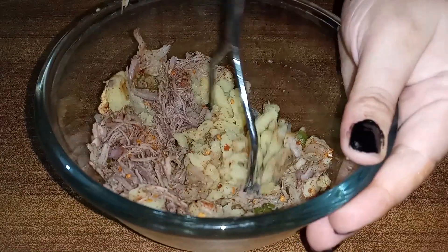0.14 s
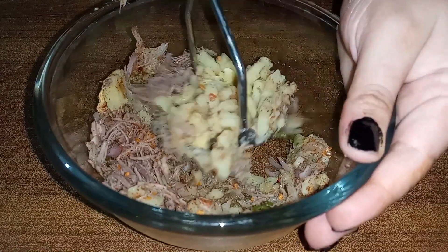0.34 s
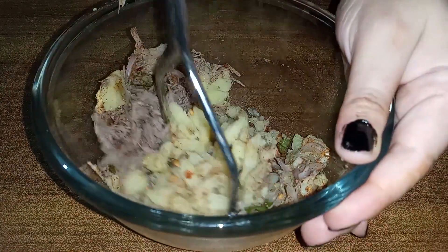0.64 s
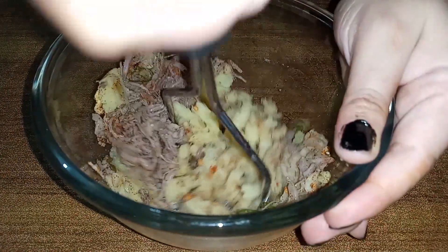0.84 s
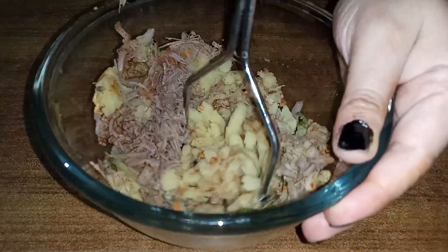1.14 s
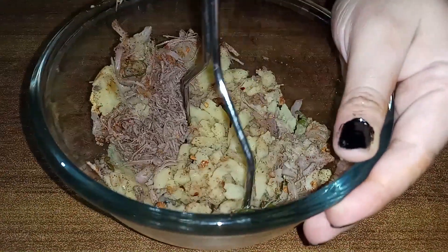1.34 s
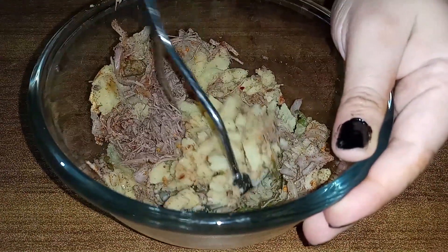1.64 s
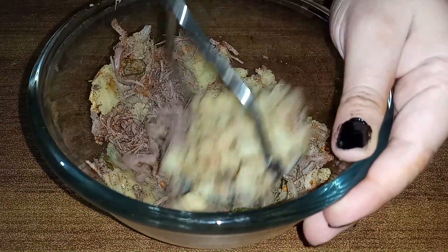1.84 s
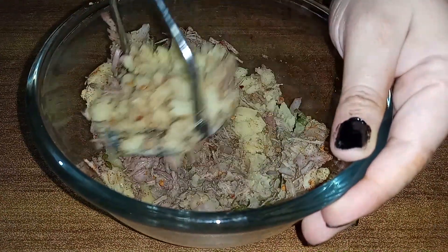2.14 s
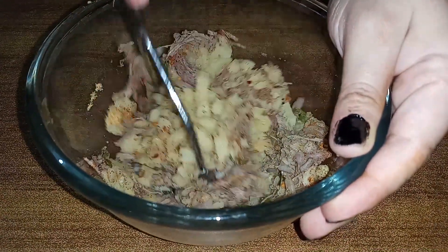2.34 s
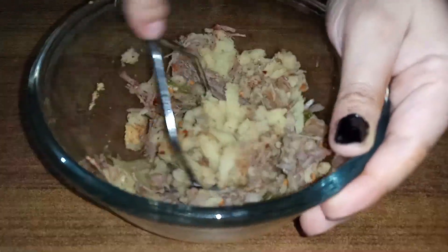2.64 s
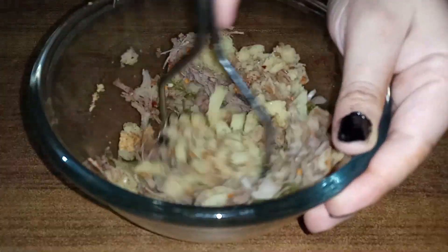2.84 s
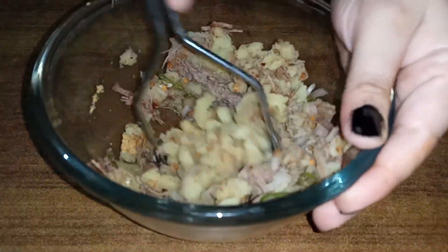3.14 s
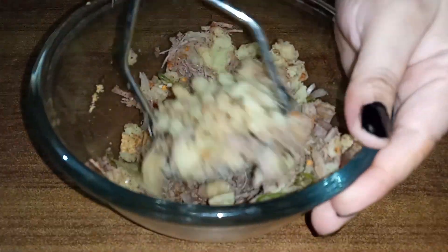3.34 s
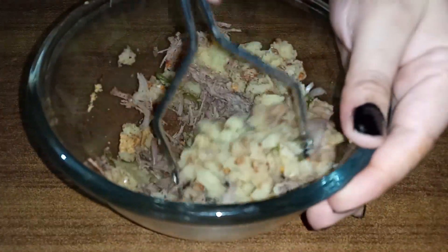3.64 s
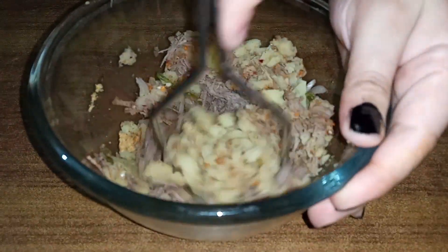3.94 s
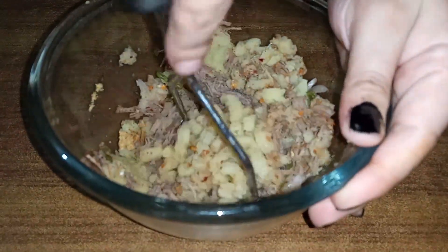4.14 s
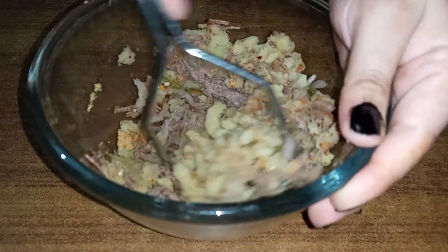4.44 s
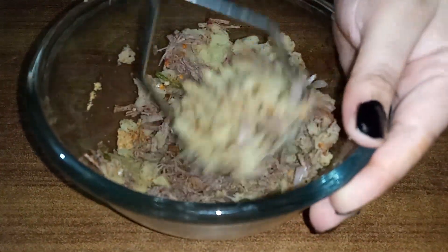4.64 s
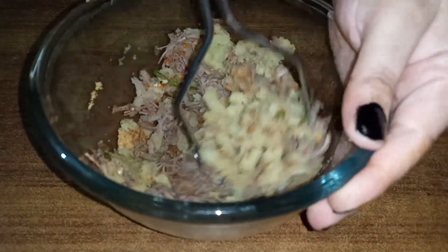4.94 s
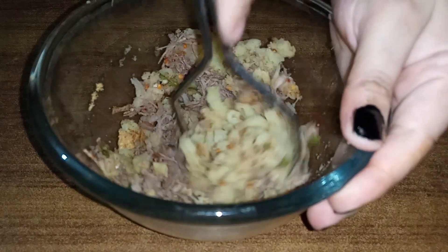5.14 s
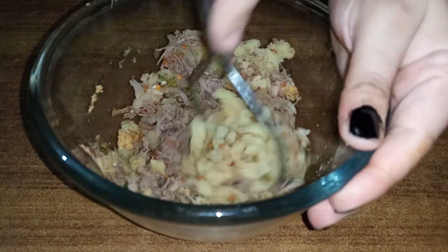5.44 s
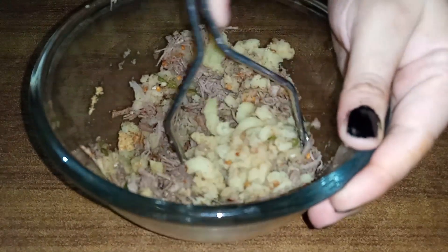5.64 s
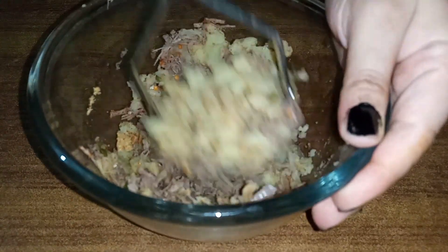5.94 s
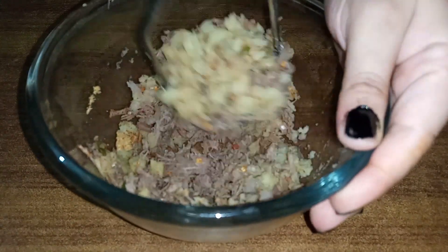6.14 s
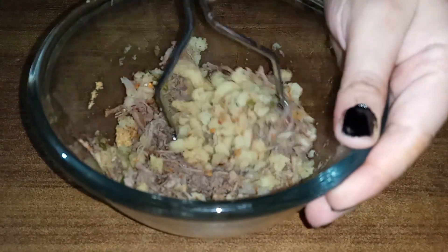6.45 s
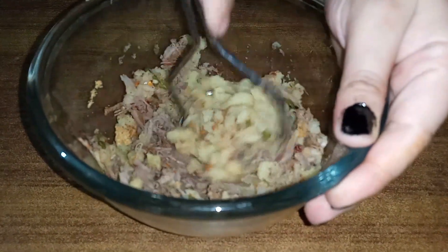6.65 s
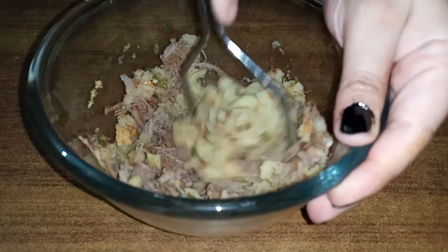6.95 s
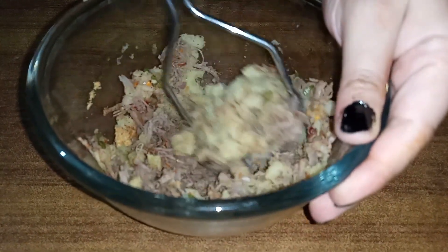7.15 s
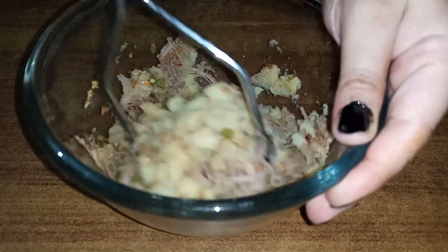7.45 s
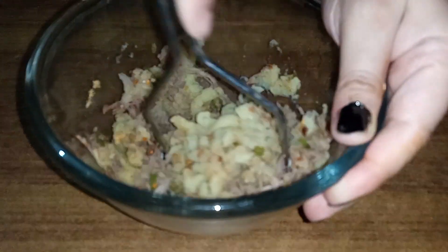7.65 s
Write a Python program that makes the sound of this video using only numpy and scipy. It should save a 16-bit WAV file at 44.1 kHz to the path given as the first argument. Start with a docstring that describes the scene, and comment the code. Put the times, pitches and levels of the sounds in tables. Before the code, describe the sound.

Moist mash crackles and squelches under a wire masher in a glass bowl, with dull knocks on a wooden table and rare glassy clinks.

```python
"""Wire masher in a glass bowl

A wire masher is pressed and twisted through a moist mash in a glass bowl on a wooden table.
Pitched pops and fizz make the mash crackle; bursts of wavelets squelch and dense low bubbles gurgle.
Ticks and bounces ring the damped glass modes; knocks and a leaning load ring the table top.
A small hard kitchen answers with decaying noise, heard by two microphones some way apart."""
import sys
import numpy as np
from scipy import signal
from scipy.fft import rfft, irfft, next_fast_len
from scipy.io import wavfile
from scipy.ndimage import uniform_filter1d

SR = 44100
rng = np.random.default_rng(int(sys.argv[2]) if len(sys.argv) > 2 else 0)


def unload_audio(sound):
    """Save the sound as a 16-bit wav file, at the path given as the first command line argument."""
    columns = np.transpose(np.atleast_2d(sound))
    # keep every value between -1 and 1, then stretch to whole-number steps
    steps = np.round(np.clip(columns, -1, 1) * 32767)
    wavfile.write(sys.argv[1], SR, steps.astype(np.int16))


def invert_db(x):
    """Field ratio 10**(x/20) for x, a level in decibels (scalar or array-like)."""
    u = np.asarray(x, float) / 20
    return 10 ** u


N = 343098  # length in samples

# balance of the two microphones: f/Hz, left over right/dB
LEFT_OVER_RIGHT = [(60, 3), (180, 3.5), (700, 7), (1400, 5.5), (2800, 9), (5600, 5), (9500, 7),
                   (14000, -7.5)]
# bowl knocking on the table: t/s, relative thump level/dB, favoured pitch f/Hz, hard edge re thump/dB
BOWL_KNOCKS = [(0.069, -25.5, 205, -5), (0.112, -31.5, 194, -35), (0.151, -27, 204, -16),
               (0.309, -50, 192, -43), (0.409, -23.5, 221, -12), (0.447, -37, 200, -32),
               (0.504, -48.5, 192, -10), (0.95, -40, 276, -3), (1.269, -36, 138, -34),
               (1.368, -39.5, 143, -49), (1.713, -52.5, 217, -18), (2.142, -33, 150, -30.5),
               (3.031, -49, 234, -9.5), (3.123, -49.5, 189, -30), (3.138, -25.5, 216, -6.5),
               (3.471, -36.5, 166, -13), (4.389, -45, 152.7, -30), (4.475, -38, 199, -19.5),
               (4.663, -22, 208, -5), (4.684, -32.5, 192, -16), (4.699, -35, 189, -12.5),
               (4.708, -27.5, 193, -16), (4.723, -28.5, 191, -11), (4.738, -29, 192, -17),
               (4.749, -28.5, 197, -7.5), (4.76, -34, 202, -5.5), (4.815, -28, 237, -6.5),
               (4.86, -38.5, 206, -18), (4.889, -41, 199, -18.5), (5.431, -54, 402.3, -13),
               (5.486, -44, 260, -8.5), (5.73, -43, 179, -8.5), (6.035, -43.5, 119, -27),
               (6.28, -56.5, 335, -30), (6.838, -48, 183, -6.5), (6.869, -42.5, 183, -34),
               (6.906, -47, 207, -9.5), (7.354, -39, 110, -17)]


def unit(x):
    """Scale to rms 1."""
    return x / np.sqrt(np.mean(x ** 2))


def colour(x, points, lag_s=0.):
    """Equalise by (f/Hz, gain/dB) points, straight between them over log frequency, and delay."""
    hz, db = np.transpose(points)
    length = x.shape[-1]
    size = next_fast_len(length, True)
    f = np.fft.rfftfreq(size, 1 / SR) + 1  # 1 Hz up, to keep the logarithm finite
    gain = invert_db(np.interp(np.log(f), np.log(hz), db))
    delay = np.exp(-2j * np.pi * f * lag_s)
    return irfft(rfft(x, size) * gain * delay, size)[..., :length]


def low_pass(x, hz):
    """Keep what lies below hz, without delay."""
    return signal.sosfiltfilt(signal.butter(2, hz, fs=SR, output="sos"), x)


def high_pass(x, hz):
    """Second-order low cut."""
    return signal.sosfilt(signal.butter(2, hz, "highpass", fs=SR, output="sos"), x)


def ring(x, hz, t60):
    """One decaying mode, with a peak near 1 for a unit blow."""
    radius = 10 ** (-3 / (t60 * SR))
    w = 2 * np.pi * hz / SR
    return signal.lfilter([np.sin(w)], [1, -2 * radius * np.cos(w), radius * radius], x)


def walk(rate):
    """Random levels held 1 / rate s and slewed twice."""
    k = int(SR / rate)
    steps = np.repeat(rng.standard_normal(N // k + 1), k)
    return uniform_filter1d(uniform_filter1d(steps, k), k)[:N]


def blows(s, gain, shape):
    """The push shape laid at each time."""
    x = np.zeros(N)
    np.add.at(x, (np.asarray(s) * SR).astype(int), gain)
    return signal.fftconvolve(x, shape)[:N]


def grains(s, hz, cycles, size):
    """Short damped wavelets, one for each row; cycles sets how many turns they take to fade by 1 / e."""
    out = np.zeros(N + SR)
    for at, f, c, g in zip((s * SR).astype(int), hz / SR, cycles, size):
        turn = np.arange(int(5 * c / f)) * f
        out[at:at + len(turn)] += g * np.cos(2 * np.pi * turn) * np.exp(-turn / c)
    return out[:N]


def effort_db(start, held, db, rise, fall, stall=0.):
    """Each effort swells, holds and dies away, ever faster as it stalls; overlapping ones add in power."""
    now = np.arange(0, N + 64, 64) / SR
    start, held, db, fall = (np.reshape(c, (-1, 1)) for c in (start, held, db, fall))
    before = np.maximum(start - now, 0)
    after = np.maximum(now - start - held, 0)
    each = db - rise * before - fall * after - stall * after ** 2
    total_db = 10 * np.log10(np.sum(invert_db(each) ** 2, axis=0) + 1e-16)
    return np.interp(np.arange(N) / SR, now, total_db)


def sides(left, right, left_lag_s=0.):
    """Colour the two microphones differently, and delay the left one."""
    hz, db = np.transpose(LEFT_OVER_RIGHT)
    return np.array([colour(left, np.c_[hz, db / 2], left_lag_s), colour(right, np.c_[hz, -db / 2])])


def pair(x):
    """The bowl is nearer the right microphone in time, so the left one hears it about 1 ms later."""
    return sides(x, x, 0.001036)


def pushes():
    """The masher driven through the mash: level of the squelch, and of the bowl's hollow relative to it."""
    # t/s, held/s, squelch level/dB, dying away/(dB per s), hollow of the bowl re squelch/dB
    push_rows = [(0, 0.18, -65.5, 143, -14), (0.072, 0.04, -51.5, 300, 0), (0.495, 0.13, -54, 88, -3.5),
                 (.65, 0.018, -52.5, 50, -8), (.74, 0.089, -54, 99, -12), (.89, 0.058, -51, 108, -10),
                 (0.957, 0.074, -49, 195, -10), (1.162, 0.022, -53, 100, -23), (1.194, 0.029, -47, 110, -5),
                 (1.34, 0.056, -62, 105, -24), (1.452, 0.048, -58, 240, -23), (1.6, 0.06, -76, 298, -29),
                 (1.71, 0.0047, -71.5, 160, -3), (1.76, 0.049, -84, 248, -12), (2.02, 0.073, -71.5, 95, -7),
                 (2.12, 0.018, -63.5, 104, -24), (2.161, 0.22, -49.5, 139, -2),
                 (2.555, 0.0086, -54.5, 111, -19), (2.612, 0.042, -49.5, 40, -10),
                 (2.701, 0.062, -51.5, 59, -4.5), (2.801, 0.025, -48, 158, -6.5),
                 (2.926, 0.073, -54.5, 143, -11), (3.05, 0.066, -63, 404, -26),
                 (3.5, 0.31, -52.5, 250, -7.5), (3.781, 0.12, -51.5, 41, -15.5),
                 (3.908, 0.011, -48, 116, -7.5), (3.97, 0.072, -60, 144, -9.5),
                 (4.101, 0.038, -55.5, 94.5, -25), (4.138, 0.051, -46, 108, -10),
                 (4.3, 0.03, -54, 189, -19), (4.41, 0.0082, -65, 270.5, -17.5), (4.8, .12, -51.5, 85, -9),
                 (4.981, 0.42, -52.5, 203, -9.5), (5.284, 0.083, -52, 78, -12),
                 (5.42, 0.072, -56.5, 100, -8), (5.53, 0.042, -55, 89, -17), (5.639, 0.13, -60, 408, -14),
                 (5.992, 0.099, -70.5, 43, -12.5), (6.115, 0.051, -59, 53, -16),
                 (6.191, 0.14, -50.5, 102, -7.5), (6.359, 0.055, -53.5, 302, -16),
                 (6.465, 0.018, -55.5, 101, -15), (6.533, 0.11, -50, 129, -10),
                 (6.69, 0.023, -57.5, 199, -26), (6.778, 0.16, -50.5, 130.5, -10.5),
                 (7.04, 0.0069, -57, 230, -3), (7.46, 0.028, -57, 60, 0), (7.55, 0.028, -57.5, 75, -25),
                 (7.59, 0.015, -52, 68, -7), (7.682, 0.094, -53.5, 94, -14), (7.76, .03, -52.5, 102, -10)]
    rise_db_s, stall_db_s2 = 540.5, 908.5
    s, held, db, fall, hollow = np.transpose(push_rows)
    squelch_db = effort_db(s, held, db, rise_db_s, fall, stall_db_s2)
    hollow_db = effort_db(s, held, db + hollow, rise_db_s, fall, stall_db_s2) - squelch_db
    return squelch_db, hollow_db


def film_snaps():
    """Small films snap all at once: random blows that each fade within milliseconds."""
    snaps_per_s, fade_s, least_db, spread_db = 120, 0.0015, -1.5, 2.5
    gap, luck = rng.exponential(size=(3000, 2)).T
    at = np.cumsum(gap) / snaps_per_s
    heard = at < N / SR
    gain = invert_db(least_db + spread_db * np.minimum(luck, 3))
    return blows(at[heard], gain[heard], np.exp(-np.arange(SR // 100) / SR / fade_s))


def tearing_films():
    """Pitched pops, one source to both microphones, over a dense fizz drawn apart for each."""
    when, pitch, length, luck = rng.random((7000, 4)).T
    size = invert_db(-4.5 * np.log(np.maximum(luck, .01)))
    pops = unit(grains(when * N / SR, 2600 * 6 ** pitch, 0.94 + 1.7 * length, size))
    fizz = rng.standard_normal((2, N)) * invert_db(4.2 * rng.standard_normal((2, N)))
    return invert_db(-14.0) * pair(pops) + unit(sides(fizz[0], fizz[1]))


def bowl_hollow(grain):
    """Air in the bowl resonates with the tearing films and wobbles in level."""
    # f/Hz, width of one filter pass/Hz, relative level/dB
    air_modes = [(1624, 268, 5.5), (1843, 180, 0)]
    hollow = 0
    for f, width, g in air_modes:
        b, a = signal.iirpeak(f, f / width, SR)
        resonance = unit(signal.lfilter(b, a, signal.lfilter(b, a, grain)))
        hollow = hollow + resonance * invert_db(g - 10 + 3 * walk(25))
    return hollow


def mash(squelch_db, hollow_db):
    """Wet films tear all over the bowl; small and large ones take turns, so the colour keeps shifting."""
    # colour of the wet mash: f/Hz, gain/dB
    mash_colour = [(180, -37), (300, -18.5), (565, -45.5), (994, -15.5), (1280, -22), (1610, -14.5),
                   (1950, -3.5), (2280, -7.5), (2650, -2), (3080, 2.5), (4020, 0), (7690, 7.5),
                   (9090, -4.5), (10900, 0), (13800, -14.5), (15200, 0), (16000, -47)]
    # borders between the sizes of film: f/Hz
    size_borders = [2410, 3600, 5500, 9100]
    snaps = film_snaps()
    flutter = invert_db(squelch_db + 0.4 + 0.74 * walk(45) + 2.5 * walk(170))
    grain = tearing_films()
    hollow = bowl_hollow(grain)
    wet = unit(colour(grain, mash_colour))
    below = [0] + [low_pass(wet, f) for f in size_borders] + [wet]
    shifting = 0
    for lower, upper in zip(below, below[1:]):
        shifting = shifting + invert_db(3.1 * walk(14) + 2.5 * walk(85)) * (upper - lower)
    bright = shifting - low_pass(shifting, 3500)  # the snaps are high in pitch
    return flutter * (shifting + snaps * bright + invert_db(np.minimum(hollow_db, 0)) * hollow)


def squelches():
    """A pocket of air bursts: a few milliseconds of wavelets scattered widely around its pitch."""
    # loud single squelches: t/s, relative level/dB, centre f/Hz
    pockets = [(.3612, -66, 7860), (.5642, -55, 7570), (.84, -51, 5000), (0.885, -51, 5800),
               (1.021, -38.5, 6840), (1.1142, -47.5, 7800), (1.1838, -44.5, 7640), (1.2146, -45, 7870),
               (1.2747, -46, 7400), (1.3854, -58, 7150), (1.4567, -57, 7100), (1.4871, -60.5, 7060),
               (1.7176, -54, 7860), (1.756, -63, 7150), (2.0259, -62, 7060), (2.0962, -56, 7000),
               (2.1531, -46, 4900), (2.208, -42, 6160), (2.3008, -51, 7000), (2.3189, -52.5, 7380),
               (2.3517, -56.5, 7780), (2.5038, -47, 6800), (2.5896, -61.5, 7000), (2.6172, -46, 3600),
               (2.9263, -56, 6950), (3.0655, -54.5, 6650), (3.097, -55.5, 8000), (3.35, -68, 8200),
               (3.7856, -53, 5900), (3.9112, -40.5, 6600), (4.029, -45.5, 6600), (4.0867, -50, 7550),
               (4.4234, -53, 7800), (4.915, -40.5, 7070), (5.158, -42.5, 7200), (5.208, -49.5, 7840),
               (5.2843, -51.5, 7800), (5.3078, -39.5, 6900), (5.4745, -53, 3300), (5.486, -46.5, 1800),
               (5.6512, -66, 6500), (5.6833, -49, 5990), (5.9894, -79, 7260), (6.0667, -53.5, 7100),
               (6.1291, -59, 7140), (6.359, -51, 6260), (6.3806, -35, 5500), (6.4172, -49, 6560),
               (6.4657, -47, 4500), (6.473, -54, 4500), (6.7763, -48, 6000), (6.8132, -45, 7400),
               (6.8427, -41.5, 6380), (6.922, -40, 7540), (7.0358, -50, 7060), (7.1288, -63, 7140),
               (7.548, -56.5, 7600), (7.6061, -47.5, 7240)]
    s, db, hz = np.repeat(pockets, 40, axis=0).T  # 40 wavelets each
    late, pitch, length = rng.random((len(s), 3)).T
    scattered_hz = np.minimum(hz * 2.6 ** (pitch - .5), SR / 3)
    size = invert_db(db + 6 * pitch - 14 * late)
    burst = grains(s + .0025 * late ** 2, scattered_hz, 1 + length, size)
    return high_pass(pair(burst), 1200)


def squish():
    """Mash squeezed through the wires gurgles low: dense, dull bubbles."""
    # t/s, held/s, level/dB
    squeeze_rows = [(.52, 0.098, -75), (2.17, 0.17, -68), (3.0, 0.15, -77.5), (3.5, 0.21, -71.5),
                    (4.132, 0.09, -73), (5.08, 0.07, -70), (5.38, 0.076, -66.5), (1.18, 0.047, -88),
                    (6.15, 0.17, -68.5), (6.82, 0.13, -70.5), (7.039, 0.039, -70.5), (7.501, 0.075, -73.5)]
    lowest_hz, span = 949, 1.7  # span: ratio of the highest pitch to the lowest
    rise_db_s, fall_db_s = 308.5, 272.5
    when, pitch, length, luck = rng.random((9000, 4)).T
    size = invert_db(-3.0 * np.log(np.maximum(luck, .05)))
    bubbles = grains(when * N / SR, lowest_hz * span ** pitch, 1.0 + 3.8 * length, size)
    dull = uniform_filter1d(uniform_filter1d(bubbles, size=11), size=11)
    level_db = effort_db(*np.transpose(squeeze_rows), rise_db_s, fall_db_s)
    return pair(invert_db(level_db) * unit(dull))


def wire_rub():
    """Wire sliding on the glass: uneven bright noise makes one mode squeak."""
    rub_db = effort_db(.485, .03, -68, 900, 148)  # start s, held s, relative dB, rise and fall dB per s
    scrape = invert_db(rub_db + 6.0 * walk(90)) * np.diff(rng.standard_normal(N + 1))
    return ring(scrape, 4550, 0.017)


def glass():
    """Each touch is a sharp tick and a quick bounce that ring the glass, damped by hand and mash."""
    # wire on glass: t/s, relative level/dB, then mode families 1, 2, 3 and bare tick re that/dB
    wire_clinks = [(0.409, -55.5, 9, -12, -21, -3.5), (0.941, -52, 18, 10.5, 21, 17.5),
                   (2.6175, -51.5, 8, 0, -5.5, -8), (3.428, -20, -13, -5, 1.5, -4),
                   (4.6642, -22.5, -0.5, -8, -18, -6), (4.6709, -40, 15, -12.5, -13, -6.5),
                   (4.692, -46, 14.5, -10.5, -14, -10.5), (4.735, -47, 17.5, -9, -14, -10.5),
                   (4.755, -49.5, 18.5, -8, -17, -8.5), (4.7135, -38.5, 14, -19, -12, -11),
                   (6.38, -48, 8, -17, 0, -4), (7.302, -74, 9.5, -13, -2, 8),
                   (7.3464, -23.5, -5.5, -5.5, -13, 3.5)]
    # f/Hz, relative level/dB, t60/s
    glass_modes = [(590, -6, 0.046), (1266, 5, 0.016), (1652, 5.5, 0.035), (1860, -2, 0.03),
                   (2090, -7.5, 0.025), (2415, -2.5, 0.036), (2620, 0.5, 0.03), (3140, 7, 0.013),
                   (3470, 11, 0.016), (4653, 11.5, 0.014), (4850, 4, .012), (5334, 8.5, 0.014),
                   (6710, 3, 0.026), (7400, 2.5, 0.008), (9060, -0.5, 0.02), (9400, -17, .02),
                   (10640, -13, 0.0082)]
    # family of each mode (1); members rise and fall together with the place of the blow
    mode_family = [1, 2, 1, 1, 1, 1, 3, 1, 2, 0, 0, 3, 0, 2, 0, 3, 0]
    s, db, *family_db, tick_db = np.transpose(wire_clinks)
    family_db = [0] + family_db  # family 0 keeps the level of the clink
    rub = wire_rub()
    t = np.arange(int(0.012 * SR)) / SR
    tick = blows(s, invert_db(db + tick_db + 7.0), t / 0.00071 * np.exp(-t / 0.00077)) * rng.standard_normal(N)
    out = colour(tick, [(400, -6.5), (1500, -6.5), (5000, 7), (8000, 6.0), (12000, 1.5),
                        (13600, -12.5), (15000, -3.0)])
    for k, (f, g, t60) in enumerate(glass_modes):
        gap = np.zeros(int(SR / f * np.ceil(.001 * f)) - 1)  # whole turns of the mode, 1 ms or more
        bounce = np.r_[.45, gap, .75, gap, .45]
        struck = blows(s, invert_db(db + family_db[mode_family[k]] - 11.0), bounce)
        out = out + (-1) ** k * invert_db(g) * ring(struck, f, t60)
    return pair(out + rub)


def rocking(s, gain, hz):
    """The bowl lands softly and springs back: a push and pull at its own pitch."""
    out = np.zeros(N)
    for at, g, f in zip((s * SR).astype(int), gain, hz):
        turn = np.arange(int(1.99 * SR / f)) * f / SR  # about two turns
        out[at:at + len(turn)] += g * np.hanning(len(turn)) * np.sin(2 * np.pi * turn) * 4 / len(turn)
    return out


def leans():
    """Weight leaning on the bowl makes the table groan, above a steady resting load."""
    # t/s, held/s, relative level/dB
    lean_rows = [(.25, 0.019, -63), (.54, 0.026, -73), (1.03, 0.015, -88), (1.3, 0.086, -74),
                 (2.22, 0.0054, -54), (2.81, 0.015, -63), (3.1, 0.037, -52.5), (3.7, 0.14, -65.5),
                 (4.051, 0.31, -69.5), (4.56, 0.086, -68), (4.839, 0.01, -55), (5.2, 0.092, -64.5),
                 (5.34, 0.13, -64.5), (5.49, 0.041, -58), (5.78, 0.018, -58.5), (6.24, 0.082, -60.5),
                 (6.64, 0.024, -64.5), (6.78, 0.11, -64), (7.041, 0.066, -61), (7.45, 0.032, -67),
                 (7.66, 0.15, -73)]
    rise_db_s, fall_db_s, resting_db = 206.5, 206, -81.5
    return np.maximum(effort_db(*np.transpose(lean_rows), rise_db_s, fall_db_s), resting_db)


def table_top(groan_db):
    """Knocks and a grumbling load ring the table top; each knock favours the modes near its own pitch."""
    # f/Hz, relative level/dB, t60/s
    table_modes = [(58.8, -24, 0.65), (91.8, -7, 0.42), (117.1, -12, 0.82), (154.4, 1, 0.33),
                   (183, 2, 0.31), (201.6, 0, 0.26), (217.1, -1, 0.25), (270.2, -1, 0.2),
                   (236, -2.5, 0.065), (326.4, 9, 0.09), (408.6, 6.5, 0.15), (528, -23, 0.23)]
    late_s = 0.0012  # the table top answers after the hard edge
    s, db, hz, _ = np.transpose(BOWL_KNOCKS)
    load = invert_db(groan_db - 31.5 + 6.2 * walk(9.7)) * rng.standard_normal(N)
    thump = 0
    for f, g, t60 in table_modes:
        struck = rocking(s + late_s, invert_db(db - 8.5 - 8.0 * np.abs(np.log2(f / hz))), hz)
        slow_load = (130 / f) ** 1.9 * load  # favours the low modes
        thump = thump + invert_db(g) * ring(struck + slow_load, f, t60)
    return pair(thump)


def foot_rattle():
    """The hard edge of each knock: a short noisy rattle of the bowl's foot."""
    s, db, _, edge_db = np.transpose(BOWL_KNOCKS)
    t = np.arange(int(0.045 * SR)) / SR
    push = blows(s, invert_db(db + edge_db - 0.5), t / 0.0037 * np.exp(-t / 0.0049))
    rattle = push * rng.standard_normal((2, N))
    # one noise shared by both microphones, a softer copy of it added to the left, and a softer noise of its own
    # for the right
    return colour(pair(rattle[0]) + invert_db(-5.0) * rattle,
                  [(80, -23.5), (200, 1.5), (400, 22.0), (700, 14.0), (1000, 15), (1400, 18.5), (1750, 8.5),
                   (2300, 3), (2800, -2.0), (3300, -4.0), (4200, -17.0), (6000, -15.5), (16000, -38.0)])


def shift_balance(x):
    """The mash and glass shift in balance, nearly always to the right of their usual place."""
    # t/s, left over right/dB
    balance_shift = [(0, -7.5), (.5, -2.5), (1.5, -7), (2, -1.5), (2.3, -3), (3.25, -2), (3.6, -2.5),
                     (4.4, -6), (4.66, 1), (4.92, -5), (5.5, -3), (6.3, -2.5), (6.7, -5.5), (7.35, -1),
                     (7.78, -4.5)]
    s, db = np.transpose(balance_shift)
    half_db = np.interp(np.arange(N) / SR, s, db) / 2
    return x * invert_db(np.array([half_db, -half_db]))


def squeak():
    """A faint thin tone that wavers in level."""
    level_db = effort_db(1.7, .17, -88, 600, 900) + 3 * walk(30)  # start s, held s, dB, rise and fall dB per s
    return pair(invert_db(level_db) * np.sin(2 * np.pi * 2003 * np.arange(N) / SR))


def kitchen(x):
    """Dense reflections arrive after a gap, build up, and die at a rate that depends on pitch."""
    # f/Hz, t60/s
    room_decay = [(125, 0.44), (500, 0.3), (2000, 0.26), (6000, 0.37), (14000, 0.24)]
    gap_s, rise_s, left_db = 0.01, 0.007, 1.5  # left_db: left over right
    t = np.arange(SR) / SR
    hz, t60 = np.transpose(room_decay)
    answer = 0
    for f in 88 * 2 ** np.arange(8):  # octave bands
        octave = signal.butter(2, [f, min(2 * f, 20000)], "bandpass", fs=SR, output="sos")
        band = signal.sosfilt(octave, rng.standard_normal((2, SR)))
        answer = answer + band * 10 ** (-3 * t / np.interp(np.log(1.4 * f), np.log(hz), t60))
    answer = answer * (1 - np.exp(-np.maximum(t - gap_s, 0) / rise_s))
    answer = answer * invert_db(np.array([[left_db], [-left_db]]) / 2)
    answer = answer / np.sqrt(np.sum(answer ** 2) / 2)  # unit energy for a side on average
    return signal.fftconvolve(x, answer, axes=1)[:, :N]


def air():
    """The quiet rumble and hiss of kitchen and microphones: steady coloured noise."""
    # f/Hz, gain/dB
    air_colour = [(18, -24), (30, -9), (50, 4.5), (103, 4.5), (616, -14.5), (1910, -19), (2170, -15),
                  (3000, -23.5), (4190, -26), (6380, -31), (7670, -17.5), (9220, -41.5), (11100, -24.5),
                  (13700, -53), (15400, -22), (16200, -68)]
    return invert_db(-70.5) * unit(colour(rng.standard_normal((2, N)), air_colour))


def scene():
    """All sources, with the bowl, glass and mash heard both direct and through the room."""
    # nearly flat colour of the wet mash as it leaves the bowl: f/Hz, gain/dB
    rim_colour = [(2000, -0.5), (2250, -0.5), (2550, 0), (3400, 0.5), (3900, -1), (4500, -0.5)]
    # colour of the reflections of hard blows: f/Hz, gain/dB
    echo_colour = [(300, 7.5), (1000, -4), (2000, 3), (3300, -1), (4700, -6), (5500, -10), (6700, 5),
                   (7250, -3.5), (9000, -2.5), (12000, 1)]
    squelch_db, hollow_db = pushes()
    wet = colour(shift_balance(mash(squelch_db, hollow_db) + squelches() + squish()), rim_colour)
    hard = foot_rattle() + shift_balance(glass())
    thump = table_top(leans())
    room = kitchen(invert_db(-11.0) * thump + invert_db(-6.5) * colour(hard, echo_colour) + invert_db(-11.5) * wet)
    return thump + hard + wet + room + air() + squeak()


def top_cut(x):
    """Nothing passes above the cut-off."""
    return signal.sosfilt(signal.butter(12, 17000, fs=SR, output="sos"), x)


def record(dry):
    """The microphones lose the deep bass, below 45.8 Hz."""
    mix = high_pass(dry, 45.8)
    return top_cut(mix)


dry = scene()
out = record(dry)
unload_audio(out)
```